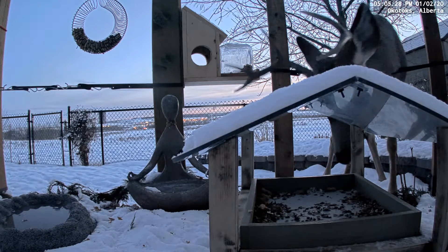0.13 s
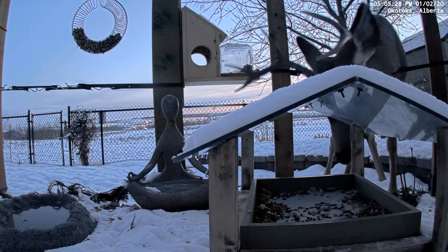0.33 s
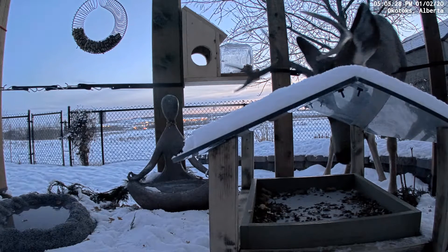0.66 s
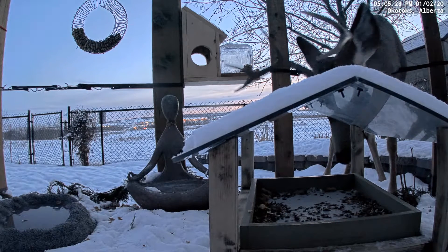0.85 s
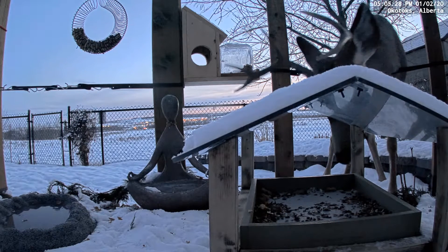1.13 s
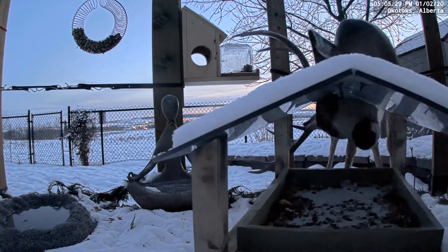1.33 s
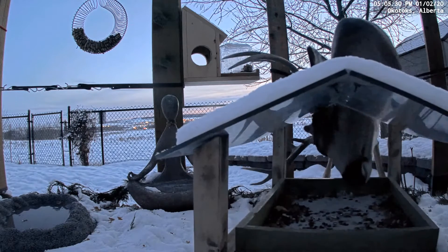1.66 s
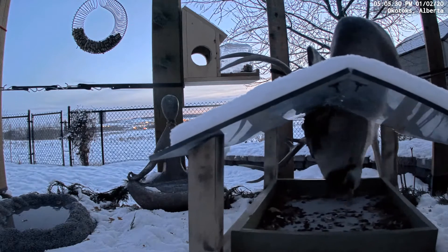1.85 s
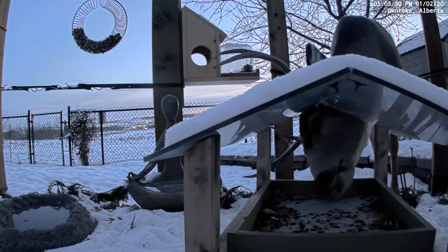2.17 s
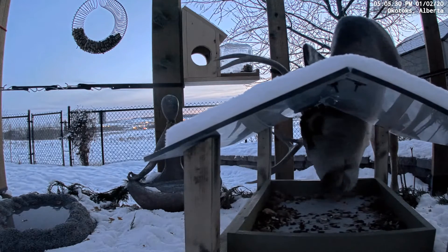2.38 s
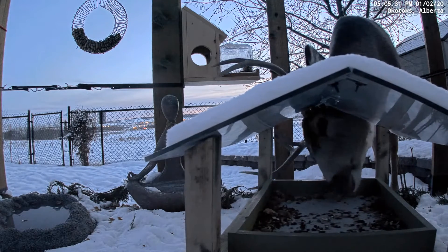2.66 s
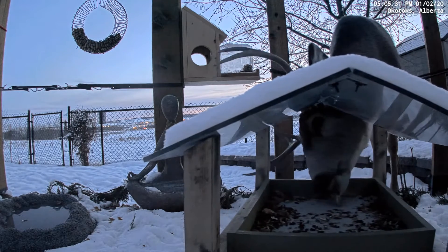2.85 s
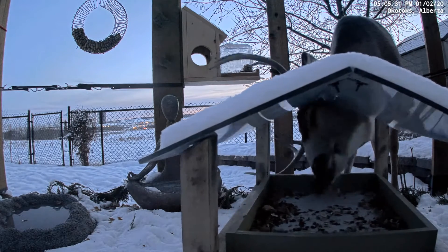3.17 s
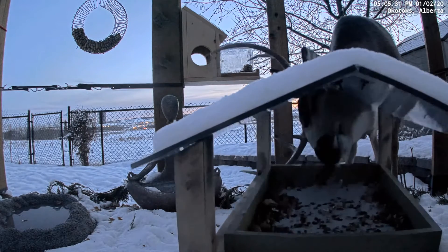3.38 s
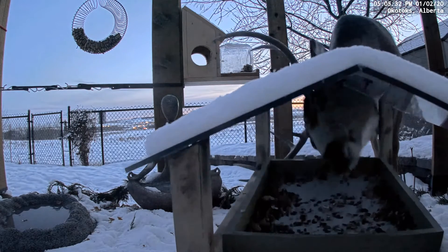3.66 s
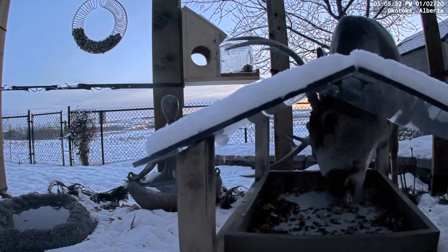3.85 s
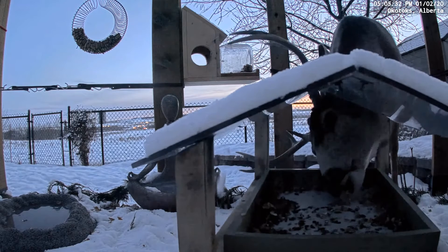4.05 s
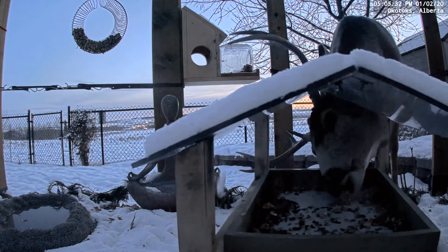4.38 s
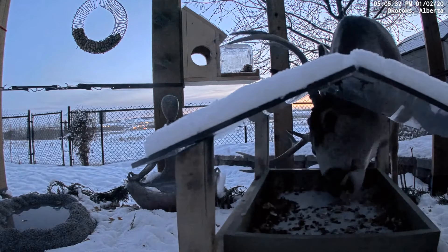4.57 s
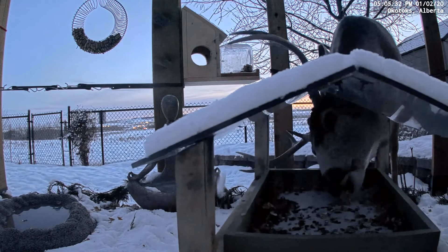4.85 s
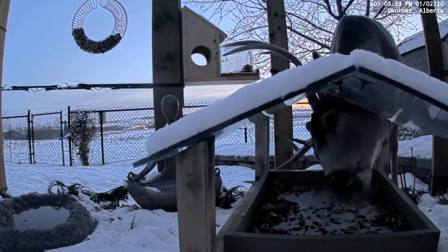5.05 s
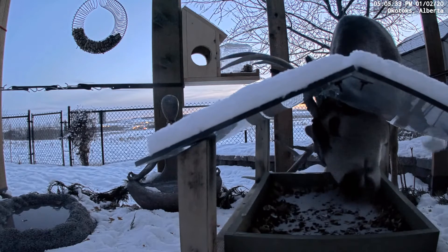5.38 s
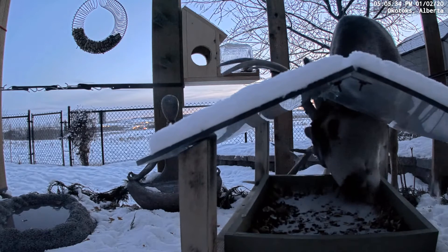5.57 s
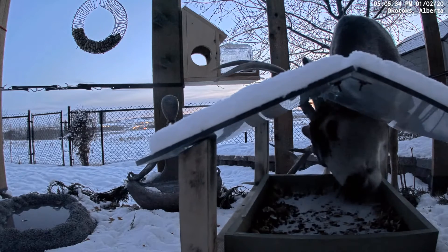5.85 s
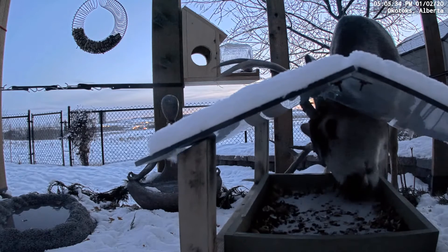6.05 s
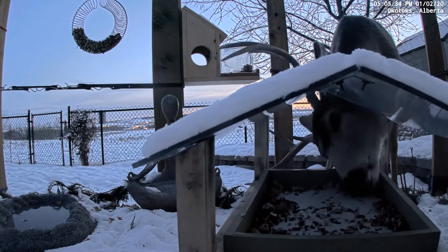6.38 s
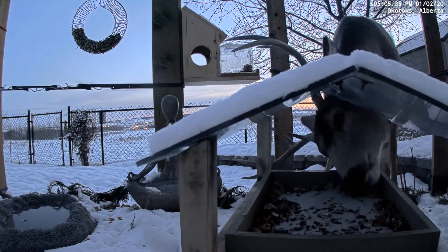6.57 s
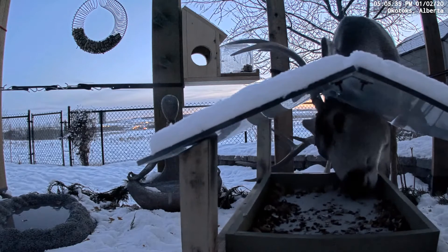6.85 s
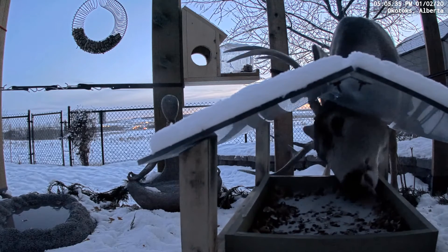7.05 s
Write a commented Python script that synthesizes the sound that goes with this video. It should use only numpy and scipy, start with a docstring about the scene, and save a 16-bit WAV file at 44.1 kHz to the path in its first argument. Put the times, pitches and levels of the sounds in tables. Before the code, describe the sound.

A deer pushes its head into a roofed wooden seed feeder in a snowy yard. Soft wind hush comes first, then gritty antler and fur scrapes, brittle sharp cracks on the thin roof, and hollow knocks on the wooden tray with low bumps. Handling peaks near the middle, then thins to faint rustles and light taps. The microphone is fixed to the feeder, very close and dry.

```python
"""A deer pushes its head under the roof of a wooden seed tray, with a camera fixed to the feeder.
First the hush of a yard, low wind and a faint rustle, all of them filtered noise or tiny clicks.
From 0.7 s antlers and fur scrape the thin roof and the muzzle rubs the tray: clumps of tiny slips.
Sharp cracks ring the roof, then from 1.4 s knocks ring the tray and jolts rock the frame with lumpy bass.
The busiest handling comes near 4 s; lighter touches follow until the end."""
import sys
import numpy as np
from scipy import signal
from scipy.fft import rfft, irfft, next_fast_len
from scipy.io import wavfile
from scipy.ndimage import uniform_filter1d

SR = 44100
rng = np.random.default_rng(int(sys.argv[2]) if len(sys.argv) > 2 else 0)


def master_out(mix):
    """Clip the mix to full scale and print it as 16-bit PCM to the path in sys.argv[1]."""
    frames = np.transpose(np.atleast_2d(mix))
    ceiling = np.clip(frames, -1, 1)
    pcm = np.round(ceiling * 32767).astype(np.int16)
    wavfile.write(sys.argv[1], SR, pcm)


def invert_db(x):
    """Field ratio 10**(x/20) for x, a level in decibels (scalar or array-like)."""
    u = np.asarray(x, float) / 20
    return 10 ** u


N = 318402  # samples, about 7.2 s


def evened(x):
    """Scales a signal to rms 1."""
    return x / np.sqrt(np.mean(x ** 2) + 1e-20)


def along(rows):
    """Draws straight lines through (time, level) rows and reads them at every sample."""
    time_s, level_db = np.transpose(rows)
    return np.interp(np.arange(N) / SR, time_s, level_db)


def coloured(x, points):
    """Filters x by a curve of (frequency, level) points, then scales it to rms 1."""
    size = next_fast_len(len(x))
    hz, db = np.transpose(points)
    bin_hz = np.fft.rfftfreq(size, 1 / SR)
    shape_db = np.interp(np.log(bin_hz + 1), np.log(hz + 1), db)
    return evened(irfft(rfft(x, size) * invert_db(shape_db), size)[:len(x)])


def wander(span_s):
    """Slow random drift of rms 1: noise averaged twice over a span of time."""
    size = round(span_s * SR)
    once = uniform_filter1d(rng.standard_normal(N), size)
    return evened(uniform_filter1d(once, size))


def patchy(x, depth_db):
    """Narrow patches of the spectrum swell and fade for some tens of ms."""
    spectrum = signal.stft(x, nperseg=1024, noverlap=768)[2]
    patches = uniform_filter1d(rng.standard_normal(spectrum.shape), size=5, axis=0)  # over frequency
    patches = uniform_filter1d(patches, size=7, axis=1)  # over time
    changed = spectrum * invert_db(depth_db * evened(patches))
    return evened(signal.istft(changed, nperseg=1024, noverlap=768)[1][:len(x)])


def slips(per_s, spread_db, clump_db, clump_s):
    """Sparse clicks of random sign and uneven size; the loud ones come in clumps."""
    size_db = spread_db * np.minimum(rng.exponential(1, N), 4) + clump_db * wander(clump_s)
    happens = rng.random(N) < per_s / SR
    return invert_db(size_db) * rng.choice([-1., 1.], N) * happens


def softened(force, top_hz):
    """A yielding contact spreads each jolt and loses the treble."""
    return signal.sosfilt(signal.butter(3, top_hz, fs=SR, output="sos"), force)


def ring(modes, extra_db=0, detune=1):
    """Decaying tone of each mode; it starts at its crest, so no push is left in the bass."""
    hz, db, t60_s = np.transpose(modes)[:, :, None]
    t = np.arange(SR // 8) / SR
    return invert_db(db + extra_db - 60 * t / t60_s) * np.cos(2 * np.pi * hz * detune * t)


def contact(length_s, grit, rise):
    """Uneven force of a touch: quick rise, short hold, quick release."""
    u = np.arange(len(grit)) / SR / np.clip(length_s, 0.0005, 0.02)
    return grit * (1 - np.exp(-u / rise)) * np.exp(-u ** 2)


def add(mix, s, sound):
    """Mixes sound in at time s."""
    part = mix[round(s * SR):][:len(sound)]
    part += sound[:len(part)]


def lingering(power, t60_s):
    """Power that dies away no faster than t60_s allows."""
    fall_db = np.arange(N) / SR * 60 / t60_s
    held_db = np.maximum.accumulate(10 * np.log10(power + 1e-14) + fall_db)
    return invert_db(2 * (held_db - fall_db))


def strokes(rows, powers, idle, press_s, lift_t60_s):
    """Level in dB of strokes over an idle power: each presses on, holds, and lifts off."""
    power = np.zeros(N)
    for (s, length_s, *_), p in zip(rows, powers):
        add(power, s, np.full(round(length_s * SR), p))
    level_db = 10 * np.log10(lingering(power, lift_t60_s) + idle)
    return uniform_filter1d(level_db, size=round(press_s * SR))


# tone of the yard's hush as the camera records it, with its treble cut above 9.5 kHz:
# (frequency [Hz], relative level [dB per Hz])
YARD_TONE = [(88, -7), (150, -2), (203, -3), (385, -5), (559, -0.5), (1020, -17.5), (3130, -21),
             (7490, -25), (8330, -25.5), (9440, -32), (9700, -66), (13600, -102), (22000, -120)]


def yard():
    """Far hush: noise with a fixed tone that swells a little."""
    level_db = -56 + 1.2 * wander(0.23)
    return invert_db(level_db) * patchy(coloured(rng.standard_normal(N), YARD_TONE), depth_db=3.5)


# gusts on the microphone, before small random drifts: (time [s], level [dB])
WIND_LEVEL = [(0, -49.5), (0.3, -48), (0.85, -49.5), (1.1, -46.5), (1.4, -47.5), (2.0, -43), (2.4, -48.5),
              (3.4, -47.5), (3.65, -47), (4.4, -46.5), (4.6, -48.5), (4.8, -41.5), (5.05, -52.5),
              (5.2, -45.5), (5.8, -48.5), (6.3, -46), (6.6, -50), (6.8, -43), (7.22, -52.5)]
# jolts that rock the frame: (time of crest [s], peak level [dB])
FRAME_JOLTS = [(1.47, -42), (1.79, -30.5), (1.89, -35.5), (2.15, -38), (2.57, -44.5), (2.849, -36.5),
               (2.99, -37), (3.08, -39), (3.76, -35), (3.84, -27), (3.92, -24), (4.082, -33), (4.18, -36.5),
               (4.7, -41), (5.43, -52), (5.53, -37), (6.19, -39)]
# tone of wind and rocking: (frequency [Hz], relative level [dB per Hz])
RUMBLE_TONE = [(8.8, -54), (15, -0.5), (42, 2), (76, -9.5), (113, -7), (147, -17.5), (300, -35), (390, -28),
               (660, -120)]


def sway():
    """Lumpy bass noise: each jolt rocks the frame and dies away, over gusts on the microphone."""
    rise_s, rock_t60_s = 0.037, 0.19
    power = np.zeros(N)
    push = signal.windows.hann(round(2 * rise_s * SR))
    for s, db in FRAME_JOLTS:
        add(power, s - rise_s, invert_db(2 * db) * push ** 2)
    gusts_db = along(WIND_LEVEL) + 1.5 * wander(0.021)
    level = np.sqrt(lingering(power, rock_t60_s) + invert_db(2 * gusts_db))
    return level * coloured(rng.standard_normal(N), RUMBLE_TONE)


# faint rustle of fur and seeds between the strokes, before random drifts: (time [s], level [dB])
RUSTLE_LEVEL = [(0, -93), (0.17, -76), (0.35, -66), (0.68, -62), (1.2, -67.5), (1.85, -64), (2.45, -65),
                (2.85, -64.5), (3.15, -64), (3.27, -63.5), (3.7, -72.5), (4.0, -55), (4.3, -63),
                (4.75, -59), (4.95, -69), (5.1, -63), (5.4, -73), (5.65, -76.5), (6.05, -59), (6.14, -62.5),
                (6.4, -63.5), (6.7, -65), (6.95, -78), (7.05, -64.5), (7.22, -65.5)]
# antlers and fur dragged along the roof:
# (start time [s], length [s], bright scrape level [dB], roof ringing level [dB])
ROOF_DRAGS = [(0.692, 0.086, -55, -59.5), (0.78, 0.044, -53.5, -53), (0.874, 0.303, -51.5, -51.5),
              (0.991, 0.13, -48, -49), (1.35, 0.1, -48.5, -53), (1.441, 0.15, -47.5, -46.5),
              (1.58, 0.086, -50, -55), (1.688, 0.11, -43.5, -46.5), (1.901, 0.045, -48, -47),
              (1.971, 0.14, -43.5, -41.5), (2.036, 0.018, -33, -34), (2.126, 0.12, -36, -42.5),
              (2.24, 0.16, -60, -54.5), (2.623, 0.041, -58.5, -69), (2.75, 0.012, -50.5, -50.5),
              (2.96, 0.14, -53, -53), (3.362, 0.39, -60, -59.5), (3.492, 0.155, -54, -54.5),
              (3.745, 0.21, -45, -45), (4.046, 0.05, -44, -39), (4.433, 0.15, -61, -55.5),
              (5.216, 0.084, -62, -68.5), (5.506, 0.115, -60.5, -67.5), (5.7, 0.046, -47.5, -48.5),
              (5.735, 0.124, -56, -61), (5.893, 0.065, -51, -62), (5.987, 0.0093, -47.5, -44),
              (6.183, 0.057, -59.5, -73.5), (6.54, 0.071, -54.5, -73), (6.756, 0.134, -60.5, -62.5),
              (7.072, 0.022, -53, -63)]
# tone of firm strokes: (frequency [Hz], relative level [dB per Hz])
FIRM_TONE = [(1530, -47), (2600, 12), (2850, -23.5), (3720, 5), (4030, 7.5), (6820, 11.5), (9500, 0.5),
             (12400, -49), (20900, -120)]
# tone of light strokes as the camera records them, with its treble cut above 9.5 kHz:
# (frequency [Hz], relative level [dB per Hz])
LIGHT_TONE = [(3000, -15), (5800, -8.5), (6800, -5), (8300, -1), (9000, -3), (9450, -6), (9700, -57.5)]
# modes of the thin roof sheet, also struck by the cracks:
# (frequency [Hz], relative level [dB], time to fall 60 dB [s])
ROOF_MODES = [(587, -7.5, 0.056), (830, -6.5, 0.015), (927, -3, 0.021), (1142, 2, 0.013),
              (1343, 4.5, 0.016), (1473, 2, 0.015), (1618, -7, 0.038), (1850, -10.5, 0.01),
              (2280, -5, 0.025), (2390, -19, 0.035), (2540, -36, 0.06), (3620, -28, 0.004),
              (4370, -1.5, 0.0037), (5240, -51, 0.016), (4600, -9.5, 0.0061), (5315, 8.5, 0.0057),
              (6390, 10.5, 0.0045), (7500, 2, 0.0064), (8026, -0.5, 0.0093), (8500, 7.5, 0.0064),
              (9240, -16, 0.0089)]


def roof_scraping():
    """Stick-slip on the roof: fine bright grains, and coarser bumps that ring the sheet."""
    press_s, lift_t60_s = 0.021, 0.1
    _, _, scrape_db, roof_db = np.transpose(ROOF_DRAGS)
    scrape_power = invert_db(2 * scrape_db)
    rustle = invert_db(2 * (along(RUSTLE_LEVEL) + 1.5 * wander(0.09)))  # as power
    level_db = strokes(ROOF_DRAGS, scrape_power, rustle, press_s, lift_t60_s)

    # The share of firm tone grows with the level, to 0.4 at most; here the rustle counts 5 dB less.
    pressed_db = strokes(ROOF_DRAGS, scrape_power, rustle * invert_db(-10.0), press_s, lift_t60_s)
    firm = 1 / (2.5 + np.exp(-(pressed_db + 64.0) / 3.0))
    fine = slips(per_s=6800, spread_db=5.0, clump_db=3.5, clump_s=0.0042)
    brushing = rng.standard_normal(N) + 0.5 * evened(fine[::-1])
    bright = np.sqrt(firm) * coloured(fine, FIRM_TONE)
    bright += np.sqrt(1 - firm) * coloured(brushing, LIGHT_TONE)

    bumps = slips(per_s=2500, spread_db=3.0, clump_db=2.5, clump_s=0.012)
    low_modes = [m for m in ROOF_MODES if m[0] < 3000]
    sheet = signal.oaconvolve(softened(bumps, top_hz=2190), ring(low_modes).sum(0))[:N]
    sheet_rustle = rustle * invert_db(2 * -3.5)  # the sheet rings 3.5 dB below the rustle
    ringing_db = strokes(ROOF_DRAGS, invert_db(2 * roof_db), sheet_rustle, press_s, lift_t60_s)
    return invert_db(level_db) * patchy(bright, depth_db=5.5) + invert_db(ringing_db) * patchy(sheet, depth_db=4.5)


# muzzle and jaw pushed over the tray:
# (start time [s], length [s], ringing level [dB], pitch of the rubbed board [Hz])
TRAY_RUBS = [(0.685, 0.047, -54, 696), (0.78, 0.37, -55, 540), (0.958, 0.099, -48.5, 700),
             (1.354, 0.1, -53, 400), (1.445, 0.14, -41, 340), (1.593, 0.15, -54, 500),
             (1.74, 0.089, -42.5, 365), (1.901, 0.04, -39, 450), (1.948, 0.17, -45.5, 473),
             (2.133, 0.035, -33.5, 540), (2.162, 0.061, -35.5, 660), (2.279, 0.1, -53, 540),
             (2.753, 0.016, -41, 500), (2.947, 0.079, -43.5, 423), (3.047, 0.056, -43.5, 630),
             (3.476, 0.11, -53, 450), (3.726, 0.23, -34.5, 298), (3.898, 0.023, -24.5, 340),
             (4.002, 0.062, -41.5, 700), (4.095, 0.02, -42.5, 348), (4.447, 0.2, -55, 540),
             (5.074, 0.074, -55.5, 450), (5.697, 0.063, -53, 600)]
# modes of the wooden tray, also struck by the knocks:
# (frequency [Hz], relative level [dB], time to fall 60 dB [s])
TRAY_MODES = [(156, 1, 0.052), (249, -15, 0.089), (309.4, 4.7, 0.03), (434, -2.5, 0.045),
              (527.6, 9.5, 0.021), (660, -4.5, 0.074), (856, 3, 0.026), (1104, -2.5, 0.058),
              (1452, -37, 0.076)]


def tray_rubbing():
    """Coarse stick-slip rings the tray, mostly in modes near the rubbed board; it never quite rests."""
    bumps = slips(per_s=2500, spread_db=3.0, clump_db=2.5, clump_s=0.012)
    voices = signal.oaconvolve(softened(bumps, top_hz=1124)[None], ring(TRAY_MODES), axes=1)[:, :N]
    voice_power = voices.var(1)
    _, _, tray_db, board_hz = np.transpose(TRAY_RUBS)
    mode_hz = np.transpose(TRAY_MODES)[0][:, None]
    near = invert_db(-24.0 * abs(np.log2(mode_hz / board_hz)))  # power share: 12 dB less per octave away
    near /= voice_power @ near
    idle = invert_db(2 * -65) / voice_power.sum()  # all modes together rest at -65 dB
    wood = np.zeros(N)
    for voice, share in zip(voices, near):
        level_db = strokes(TRAY_RUBS, share * invert_db(2 * tray_db), idle, press_s=0.022, lift_t60_s=0.077)
        wood += voice * invert_db(level_db)
    return wood


# antler and seed cracks; contact is limited to 0.5-20 ms:
# (time [s], treble peak level [dB], middle voice of the roof against the treble [dB],
#  contact length [s], pitch of the touched spot [Hz])
ROOF_CRACKS = [(0.7471, -18.5, -10, 0.0014, 5240), (0.7697, -8, 5.5, 0.0057, 5170),
               (0.8302, -27, -4, 0.0018, 8520), (1.0868, -13, -8, 0.00073, 5440),
               (1.1016, -20, -12.5, 0.0043, 8300), (1.11, -42.5, 1, 0.0079, 5000),
               (1.3625, -29.5, -18, 0.0019, 8940), (1.4569, -21, -4.5, 0.0072, 7700),
               (1.483, -25, -10, 0.0027, 5610), (1.507, -32, -24, 0.0067, 7300),
               (1.5372, -26.5, -6, 0.033, 7960), (1.7166, -27, -9, 0.0052, 6490),
               (1.7421, -18.5, -2, 0.0099, 4400), (1.7577, -25.5, 4.5, 0.0046, 9100),
               (1.8032, -12, -9.5, 0.00079, 5200), (1.8141, -46, 20.5, 0.0031, 8380),
               (1.921, -15, -2, 0.0068, 4630), (1.974, -29.5, -14, 0.004, 6650),
               (2.0117, -20, -12, 0.003, 8750), (2.0188, -18, -1, 0.0034, 7990),
               (2.1369, -21, -1, 0.006, 8500), (2.144, -16.5, -6, 0.0044, 9240),
               (2.2361, -26.5, 7, 0.0032, 7300), (2.511, -33, -27, 0.0047, 6250),
               (2.5978, -36, -4, 0.0042, 7780), (2.8898, -30.5, -20, 0.00082, 8480),
               (2.9448, -40, -3, 0.0064, 5940), (3.074, -24, -4, 0.0049, 5700),
               (3.358, -44.5, -14, 0.004, 9040), (3.3756, -36, -11, 0.0018, 8610),
               (3.538, -38, -13, 0.0033, 8270), (3.5774, -27.5, -24, 0.0042, 6470),
               (3.64, -51.5, 19.5, 0.0082, 6410), (3.7564, -40.5, 6.5, 0.0058, 6880),
               (3.917, -21.5, 2, 0.011, 5840), (3.9234, -3.5, -14, 0.00044, 5320),
               (4.02, -23, 0, 0.0057, 5340), (4.1624, -35.5, -6, 0.017, 8100),
               (4.389, -45, -16, 0.006, 8400), (5.7023, -35.5, 0, 0.0053, 7750),
               (5.9395, -31.5, -30, 0.0059, 6250), (5.9853, -29.5, -20, 0.0041, 7900),
               (6.4274, -40, -11, 0.0044, 6870), (7.026, -36, -11.5, 0.006, 4000),
               (7.123, -39, 6.5, 0.0055, 8400), (7.153, -30.5, -13, 0.0012, 8310)]


def cracks():
    """A sharp first touch, then grit; treble modes near the pitch of the touched spot answer most."""
    out, hz = np.zeros(N), np.transpose(ROOF_MODES)[0]
    low = hz < 3000
    touch = signal.unit_impulse(1800, idx=12)
    # the middle voice of a crack stays between 400 Hz and 3.2 kHz
    middle_band = signal.butter(2, [400, 3200], "band", fs=SR, output="sos")
    for s, db, middle_db, length_s, spot_hz in ROOF_CRACKS:
        away = np.where(low, 0, abs(np.log2(hz / spot_hz)))[:, None]  # octaves
        chance_db = 2 * rng.standard_normal((len(hz), 1))
        detune = 1 + rng.standard_normal((len(hz), 1)) / 40
        modes = ring(ROOF_MODES, -7.0 * away + chance_db, detune)
        force = contact(length_s, rng.standard_normal(1800), rise=0.1)
        middle = signal.fftconvolve(force + 9.0 * touch, modes[low].sum(0))
        middle = signal.sosfilt(middle_band, middle)
        treble = signal.fftconvolve(force + 2.35 * touch, modes[~low].sum(0))
        sound = treble / abs(treble).max() + invert_db(middle_db) * middle / abs(middle).max()
        add(out, s, invert_db(db) * sound)
    return out


# knocks through the tray; contact is limited to 0.5-20 ms:
# (time [s], peak level [dB], pitch of the struck board [Hz], contact length [s])
TRAY_KNOCKS = [(1.361, -43, 330, 0.0083), (1.452, -27.5, 450, 0.0083), (1.539, -25.5, 296, 0.0031),
               (1.743, -26.5, 490, 0.004), (1.9, -12.5, 575, 0.0039), (1.923, -20.5, 275, 0.0084),
               (1.974, -24, 330, 0.0044), (2.135, -42, 511, 0.0057), (2.234, -22.5, 660, 0.012),
               (2.757, -25, 274, 0.0084), (2.801, -33.5, 220, 0.015), (2.959, -40, 536, 0.015),
               (2.976, -21, 430, 0.0028), (3.021, -31, 444, 0.0051), (3.077, -28, 580, 0.0043),
               (3.528, -39.5, 620, 0.0078), (3.742, -15, 450, 0.0045), (3.754, -17, 434, 0.0099),
               (3.786, -13.5, 242, 0.0092), (3.818, -19, 336, 0.00096), (3.846, -13.5, 304, 0.026),
               (3.871, -19, 436, 0.0021), (3.902, -13, 284, 0.0014), (3.919, -15, 565, 0.0068),
               (3.934, -16.5, 324, 0.003), (4.02, -25, 524, 0.0062), (4.084, -18, 294, 0.0042),
               (4.155, -35, 310, 0.015), (5.039, -36, 566, 0.0044), (5.083, -31.5, 540, 0.0025),
               (5.333, -40, 515, 0.0043), (5.363, -34.5, 541, 0.00073), (5.7, -51, 907, 0.0043),
               (5.78, -39, 530, 0.0066), (5.819, -35, 510, 0.0065), (5.993, -31, 550, 0.014),
               (6.049, -37, 540, 0.013), (6.193, -31.5, 425, 0.0025), (7.123, -27, 850, 0.0064)]


def knocks():
    """A soft, gritty push on the tray; modes near the pitch of the struck board answer most."""
    out, hz = np.zeros(N), np.transpose(TRAY_MODES)[0][:, None]
    for s, db, board_hz, length_s in TRAY_KNOCKS:
        away = abs(np.log2(hz / board_hz))  # octaves
        chance_db = 0.9 * rng.standard_normal(hz.shape)
        detune = 1 + 0.025 * rng.standard_normal(hz.shape)
        body = ring(TRAY_MODES, -17.0 * away + chance_db, detune).sum(0)
        force = contact(length_s, 0.67 + rng.standard_normal(1800), rise=0.11)
        sound = signal.fftconvolve(softened(force, top_hz=1070), body)
        add(out, s, invert_db(db) * sound / abs(sound).max())
    return out


def scene():
    """Adds all sources at one microphone."""
    return (yard() + sway() + roof_scraping() + tray_rubbing() + cracks() + knocks())[None]


def low_pass(x):
    """Removes everything above the highest recorded frequency."""
    return signal.sosfilt(signal.butter(12, 10950, fs=SR, output="sos"), x)


def record(dry):
    """The camera's steep band limit takes away the treble above 9734 Hz."""
    edge = signal.firwin(201, 9734, window=("kaiser", 3.5), fs=SR)
    mix = signal.oaconvolve(dry, edge[None], "same")
    return low_pass(mix)


dry = scene()
out = record(dry)
master_out(out)
```